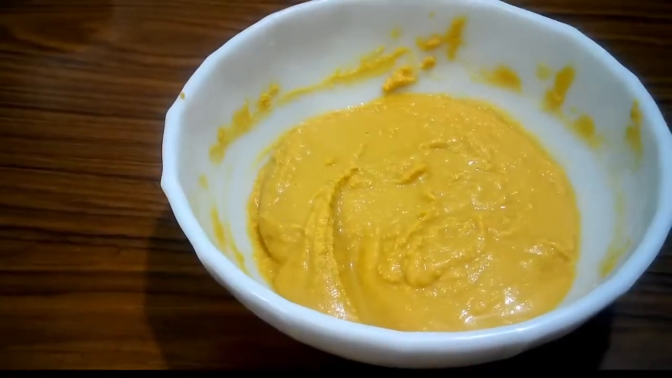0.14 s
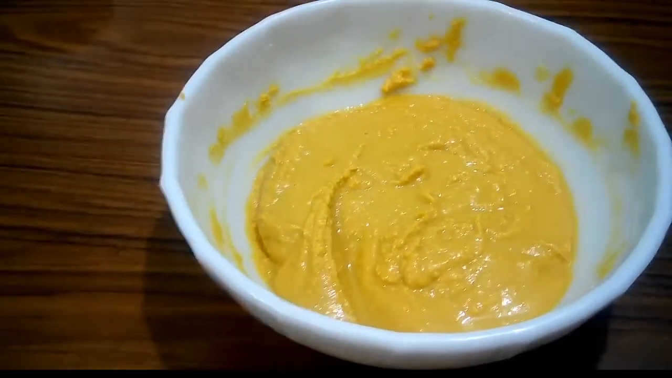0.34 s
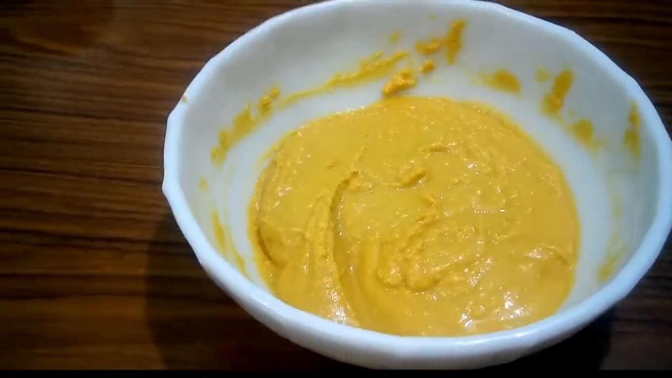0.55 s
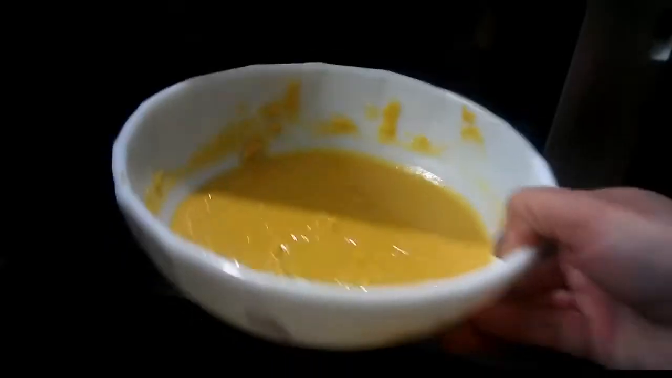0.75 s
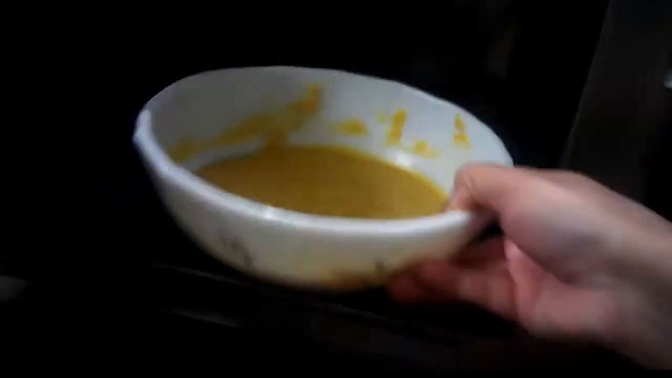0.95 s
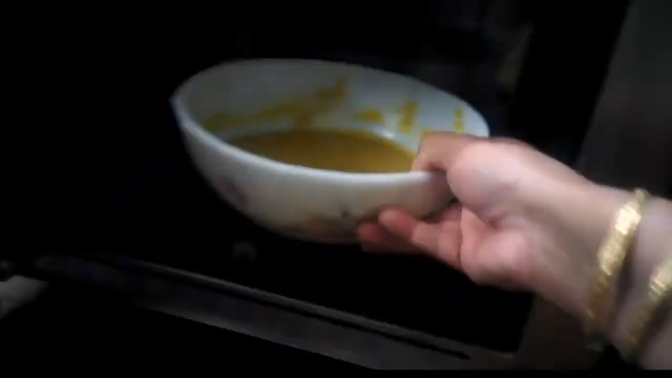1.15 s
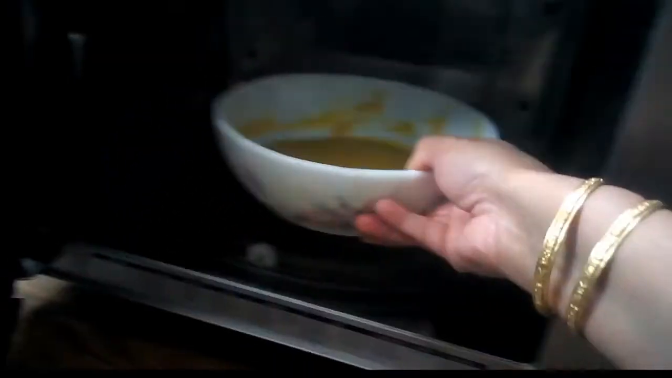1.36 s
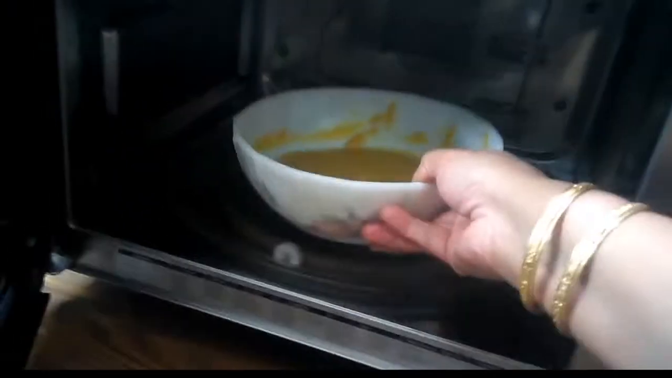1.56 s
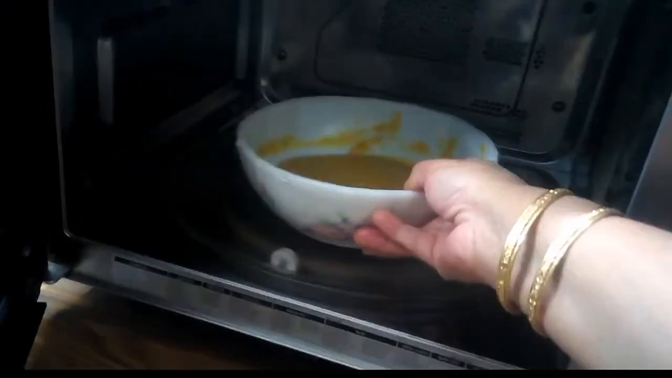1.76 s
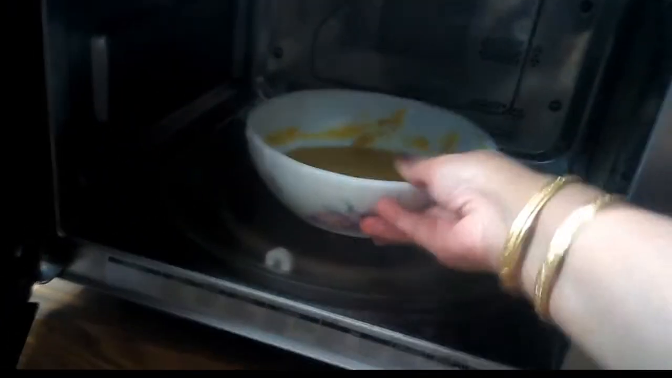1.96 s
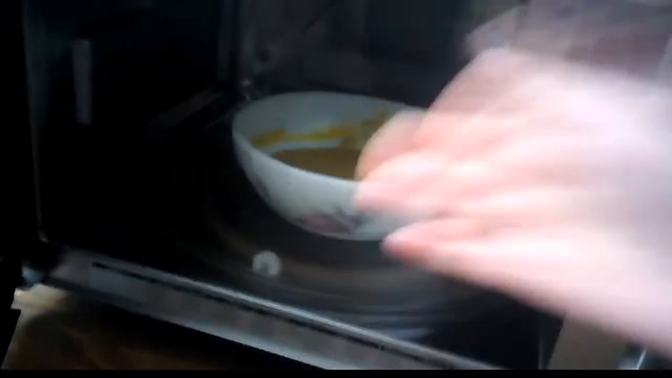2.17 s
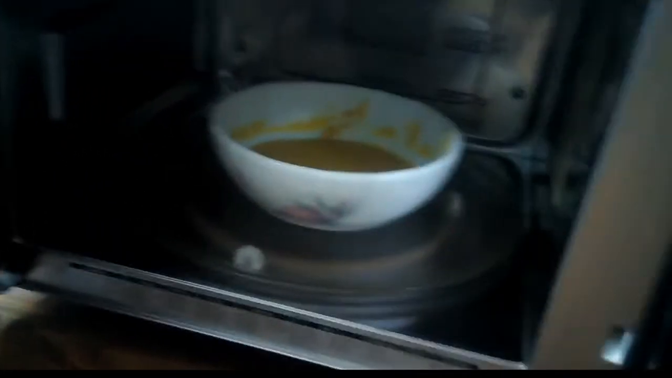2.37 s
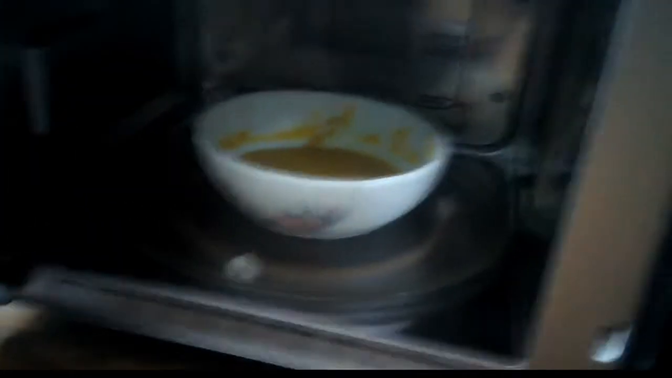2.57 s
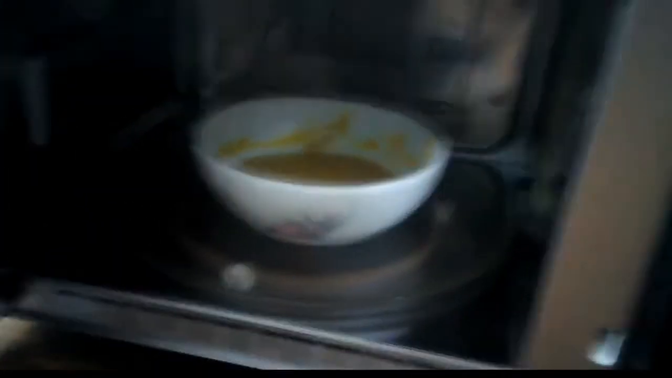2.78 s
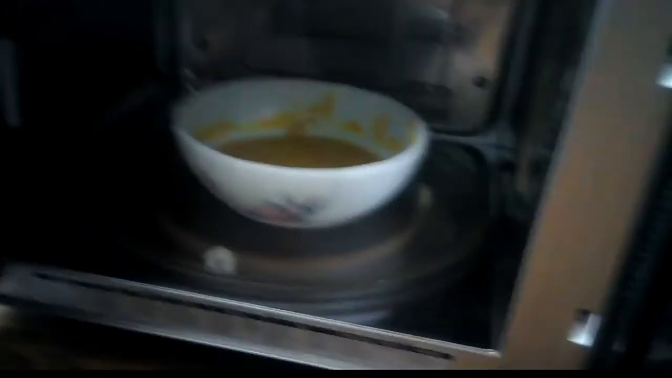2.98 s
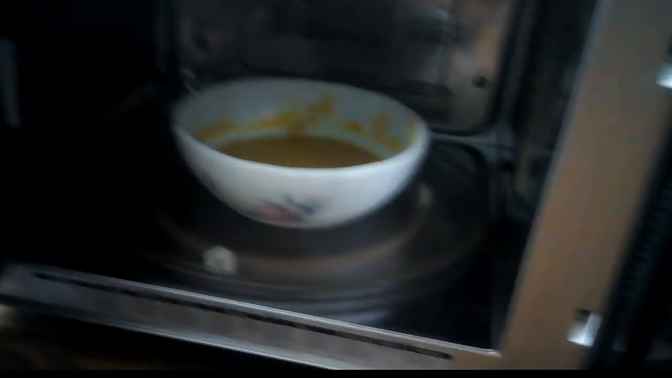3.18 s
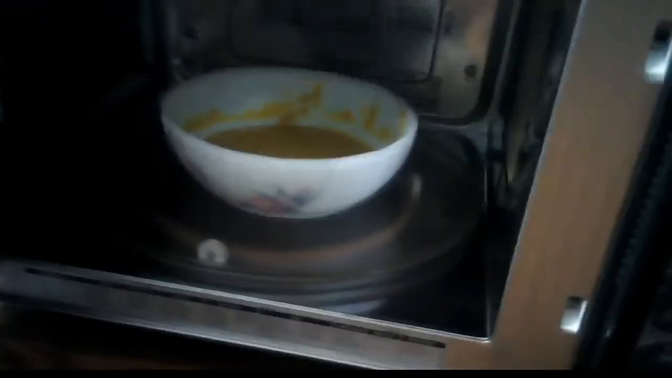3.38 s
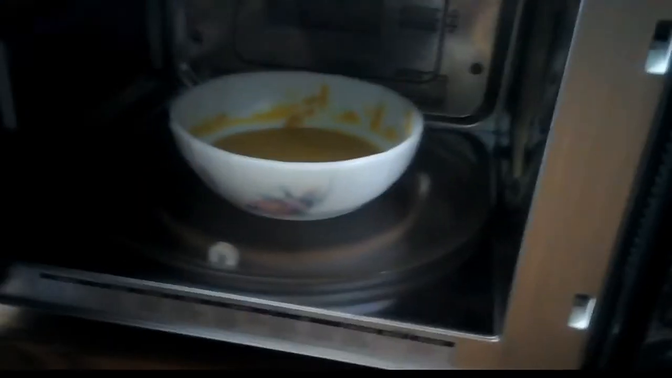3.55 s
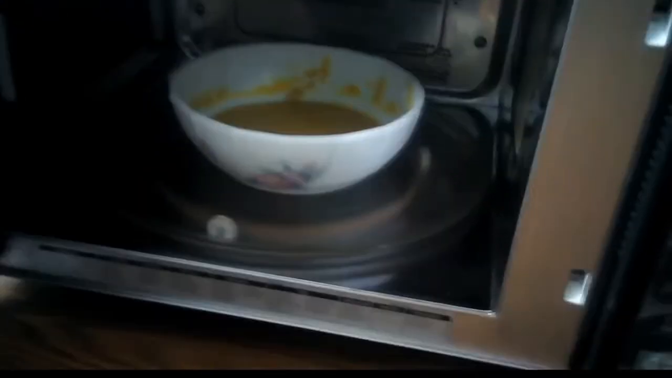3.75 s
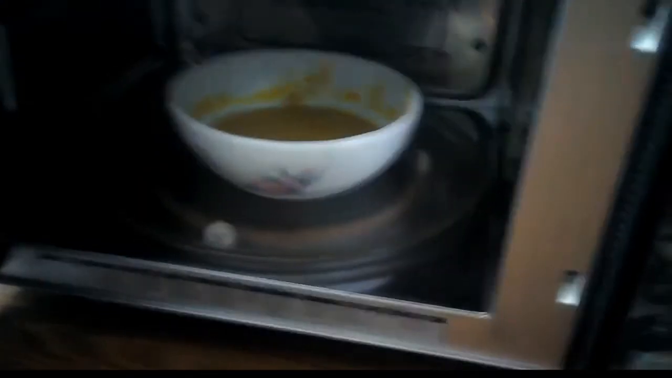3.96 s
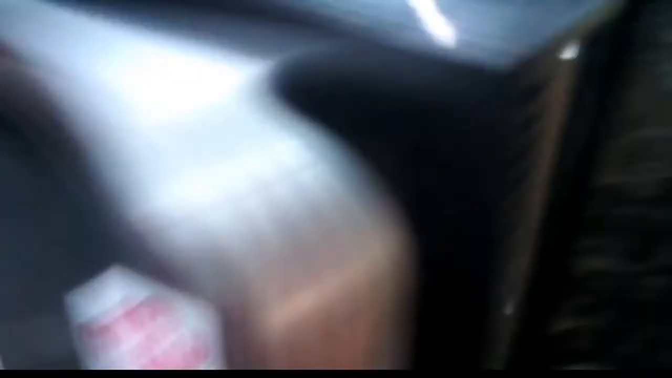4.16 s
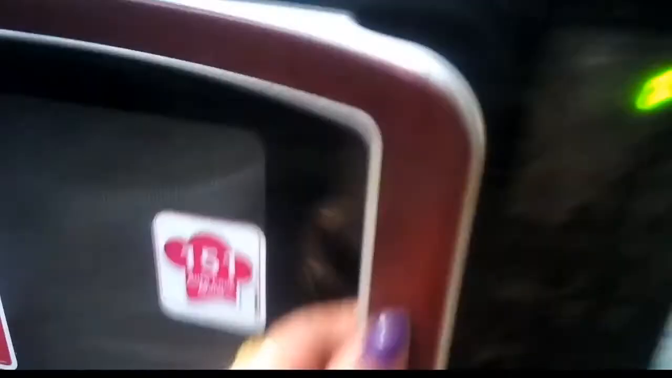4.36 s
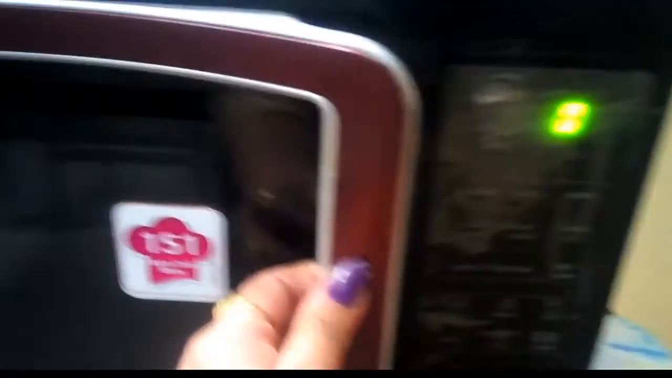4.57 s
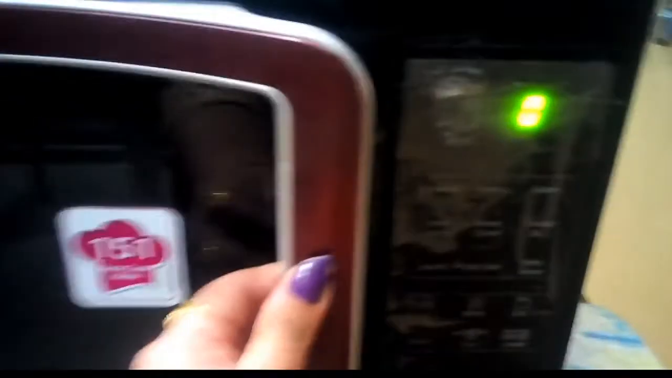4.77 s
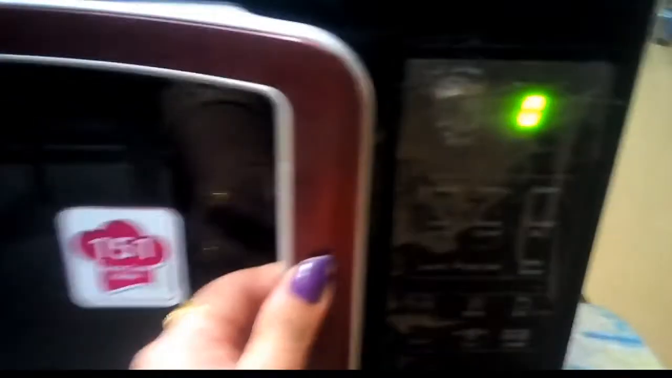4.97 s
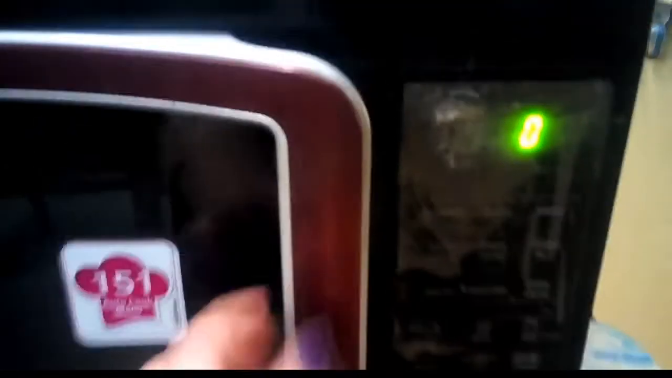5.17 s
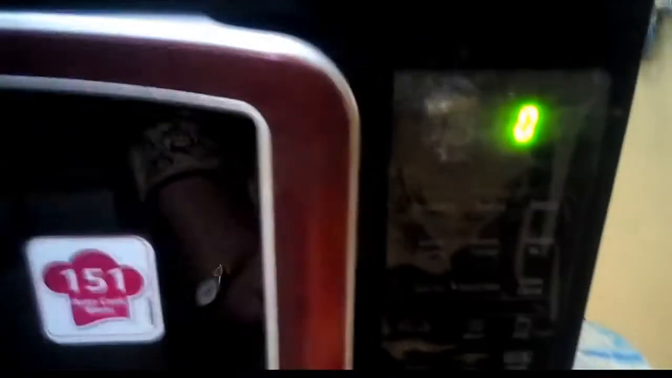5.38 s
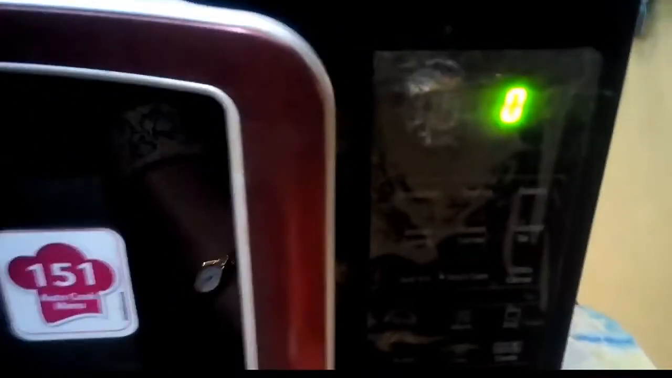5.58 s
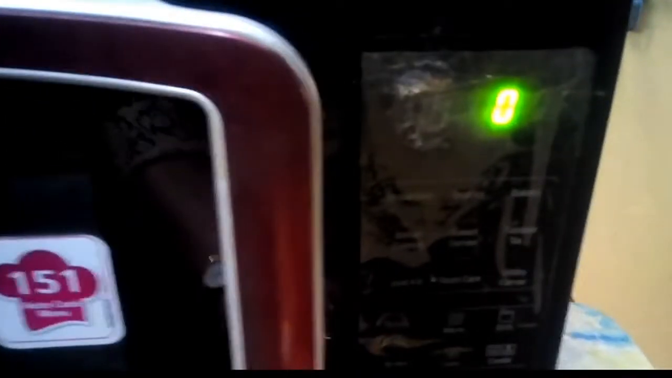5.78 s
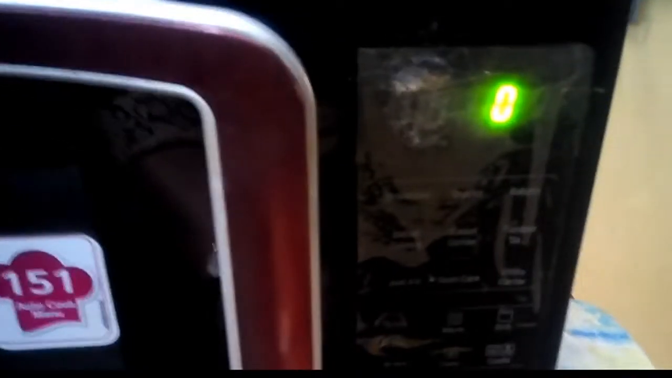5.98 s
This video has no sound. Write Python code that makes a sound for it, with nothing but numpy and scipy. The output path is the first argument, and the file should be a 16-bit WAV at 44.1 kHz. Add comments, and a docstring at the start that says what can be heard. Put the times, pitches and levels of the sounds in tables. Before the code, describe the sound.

A quiet kitchen is heard through a close handheld phone, with low hiss and a very thin high whine that fades after the first second. At about 0.5 s a finger taps the phone case dryly; sound drops out from roughly 0.6 to 0.75 s. A barely audible bangle clink comes near 1 s. At 1.95 s a glass bowl hits the microwave turntable with a loud, bright clink, ringing in the hollow metal cavity; at 2.2 s it rocks flat with a duller clunk and quick rebounds, then scrapes briefly around 2.4 s. Soft sleeve rustles brush past at 2.9-3.4 s, with case taps at 3.4 and, more firmly, 3.8 s. Dull door knocks at 4.1 s lead to a faint rub. The door clacks at 4.85 s and slams at 5.0 s with a huge sharp snap and boom, followed by fading rattle and small settling knocks until about 5.8 s.

```python
"""A glass bowl clinks down on a microwave's turntable, rocks flat and is nudged; then the door snaps shut.
Bowl, turntable and cabinet are ringing sines; the oven cavity, door panels and kitchen are fading noise.
Filtered noise makes the sliding glass, the rubbing door, the rustling sleeve and the quiet kitchen.
Finger taps, a clink of bangles and a thin whine join in. The sound drops out briefly near the start.
A phone held close picks it all up and overloads on the loudest blows."""
import sys
import numpy as np
from scipy import signal
from scipy.fft import rfft, irfft
from scipy.io import wavfile

SR = 44100
rng = np.random.default_rng(int(sys.argv[2]) if len(sys.argv) > 2 else 0)


def generate_wav(signal):
    """Clip the signal to [-1, 1] and save it as 16-bit WAV at the path in sys.argv[1]."""
    frames = np.transpose(np.atleast_2d(signal))
    scaled = np.clip(frames, -1, 1) * 32767
    pcm = np.round(scaled).astype(np.int16)
    wavfile.write(sys.argv[1], SR, pcm)


N = 265923  # length in samples

# The bowl meets the turntable. Each row: start in seconds, wall ring in dB, foot ring in dB, turntable
# clack in dB, thud of its support in dB, contact cut-off in Hz, number of rebounds.
BOWL_BLOWS = [(1.9511, -12, -14, 3, -21.5, 4000, 0), (1.956, -1.5, 0.5, 0.5, -26, 13000, 0),
              (1.9953, -17.5, -16, -4.5, -37.5, 2800, 2), (2.173, -25.5, -12, -10.5, -10.5, 2940, 0),
              (2.195, -42, -6, -11, -27, 2900, 0), (2.2029, -29.5, -9, -8, -2, 1391, 2)]
# Notes of the bowl's wall as it lies flat. Each row: pitch in Hz, level in dB, time to fall 60 dB in seconds.
WALL_MODES = [(1049, -29, 0.31), (1086, -31, .3), (1193, -17, 0.42), (1242, -27, 0.33), (1360, -31, 0.22),
              (1440, -26, 0.094), (1510, -31.5, .28), (2028, -23, 0.4), (2130, -25, 0.37),
              (2416, -33.5, .26), (3029, -9, 0.15), (2920, -38, 0.4), (3023, -14.5, 0.34), (3220, -28, 0.3),
              (4790, -34, .3), (4910, -31, 0.26), (5510, -35.5, .23), (6616, -60, .3), (6703, -53.5, .15),
              (7840, -55.5, .12)]
# Notes that a blow on the bowl's foot brings out. Each row: pitch in Hz, level in dB, 60 dB fall in seconds.
FOOT_MODES = [(3629, -38.5, .1), (4110, -37, .18), (4222, -30, 0.2), (8660, -54, .22), (9240, -55, .2),
              (9700, -52, 0.39), (9600, -54, 0.24), (10450, -58.5, 0.1807)]
# Notes of the loaded glass turntable. Each row: pitch in Hz, level in dB, 60 dB fall in seconds.
TURNTABLE_MODES = [(611, -19, 0.1), (883, -30.5, 0.15), (1004, -22, 0.11), (1130, -9.5, 0.033),
                   (1330, -17.5, 0.037), (1469, -15, 0.033), (2068, -13, 0.05), (2351, -23.5, 0.054),
                   (3530, -25, 0.15)]
# Notes of the roller support and oven floor. Each row: pitch in Hz, level in dB, 60 dB fall in seconds.
SUPPORT_MODES = [(300, -18, 0.1112), (318, -32, 0.94), (330, -29, .85), (397, -35.5, 0.58),
                 (446, -44.5, 0.78), (583.7, -21, 0.2), (597, -40.5, .85), (651, -36, 0.23), (73, -41, .4)]
# The dense ring of the oven cavity. Each row: frequency in Hz, level in dB, 60 dB fall in seconds.
CAVITY_BANDS = [(49.76, -35.5, 0.61), (149, -29, 0.93), (307, -13, 1), (650, -13, 0.9), (710, -21.5, 0.98),
                (1240, -16, 0.93), (1823, -21.5, 0.85), (3340, -18.5, 0.57), (4400, -36, 0.7),
                (6000, -59.5, .2), (10000, -63.5, .15), (16070, -61, 0.083)]
# The hand or the turntable presses on the glass and damps it. Each row: middle in seconds, loss in dB.
GLASS_PRESSES = [(2.03, 6.5), (2.19, 18), (2.455, 16.5)]
# The bowl is nudged along. Each row: peak in seconds, pressure in dB, rise in seconds, fall in seconds.
BOWL_NUDGES = [(2.369, -30, .026, 0.026), (2.426, -34.5, 0.0099, 0.0066)]

# Blows of the door. Each row: start in seconds, panel rattle in dB, latch crack in dB, cabinet boom in dB,
# contact cut-off in Hz.
DOOR_BLOWS = [(4.114, -45, -53, -61, 5000), (4.131, -39, -47.5, -62, 4600),
              (4.1387, -34.5, -36.5, -58, 4850), (4.849, -19.5, -32, -33, 6500),
              (4.854, -17.5, -27.5, -30.5, 5800), (4.873, -38.5, -28.5, -21, 9500),
              (4.996, -11.5, -49.5, -32.5, 11000), (5.006, -11.5, -24.5, -37.5, 12100),
              (5.0143, 0.5, -4.5, -0.5, 16000)]
# Loose panels settle after the slam. Each row: start in seconds, rattle in dB.
PANEL_SETTLING = [(5.336, -23.5), (5.385, -32.5), (5.4888, -33), (5.5858, -31.5), (5.769, -37.5)]
# Notes of the cabinet's panels; the first two are the heave of the whole door.
# Each row: pitch in Hz, level in dB, 60 dB fall in seconds.
CABINET_MODES = [(196, -4, 0.058), (415, -5, 0.048), (89, -29.5, .6), (120, -35, 1.3), (170, -32.5, 0.56),
                 (201, -30.5, 0.42), (215.5, -24, 0.45), (257, -29.5, 0.7), (357, -22.5, 0.65),
                 (405, -21.5, 0.17), (451.7, -26, 0.73), (492, -36.5, 1.3), (556, -20.5, 0.42),
                 (655, -28, .5), (736, -37.5, .55), (1013, -20.5, 0.17), (1137, -34, 0.43),
                 (1755, -24, 0.19), (1840, -35, 0.36), (2600, -36, 0.51)]
# Door panels and kitchen together. Each row: frequency in Hz, level in dB, 60 dB fall in seconds.
PANEL_BANDS = [(65, -27.5, .7), (90, -12.5, 1), (200, 0, 0.87), (450, -5, 0.68), (750, -11.5, 0.89),
               (1100, -8.5, 0.63), (1900, -12.5, 0.67), (3080, -10.5, 0.54), (4390, -20, 0.47),
               (5570, -30, 0.39), (7400, -39.5, .26), (9900, -32, 0.38), (11480, -42, 0.13),
               (16000, -39, .12)]
# The latch hooks snapping home. Each row: frequency in Hz, level in dB, 60 dB fall in seconds.
LATCH_BANDS = [(60.2, -17.5, .04), (300, -3.5, 0.024), (1200, 0.5, .03), (2989, 10.5, 0.03),
               (5732, -2.5, 0.014), (7600, -21.5, 0.016), (9400, -8, 0.038), (15600, -27.5, .02)]
# The open door is pulled off its stop. Each row: start in seconds, level in dB.
DOOR_STOP_KNOCKS = [(4.114, -1), (4.1407, -2), (4.151, 6), (4.177, -7.5)]
# Notes of the free-hanging door. Each row: pitch in Hz, level in dB, 60 dB fall in seconds.
HINGE_MODES = [(118, -55.5, 0.3), (175, -58, .6), (243.5, -35, 0.29), (245, -47.5, 0.76), (374, -38, 0.08),
               (448, -36.5, 0.1), (425, -55, 0.72), (615, -55.5, 0.32), (712, -45, 0.079)]
# Rubs of the moving door: the hinge as it swings, then the latch hooks sliding on their ramp.
# Each row: peak in seconds, level in dB, rise in seconds, fall in seconds.
DOOR_RUBS = [(4.47, -52, 0.19, .15), (4.815, -57, 0.047, .04)]
# Colour of the rubbing door. Each row: frequency in Hz, level in dB.
DOOR_RUB_COLOUR = [(60, -9.5), (150, 12), (260, 9), (500, -2.5), (1100, 7), (1800, -10), (2700, -6),
                   (5000, -19), (16000, -42.5)]

# Fingers tap on the phone's case. Each row: start in seconds, level in dB, contact cut-off in Hz,
# hollow pitch of that spot in Hz.
CASE_TAPS = [(0.4905, 0.5, 4100, 715), (0.505, -19, 4500, 3600), (0.614, -20, 5170, 4030),
             (3.37, -14.5, 3800, 1295), (3.593, -26.5, 4000, 3000), (3.771, -21, 5000, 1290),
             (3.7821, -2, 1700, 1050), (3.7842, 0, 4000, 1590), (3.789, -4, 14000, 496)]
# The phone's case. Each row: frequency in Hz, level in dB, 60 dB fall in seconds.
CASE_BANDS = [(100, -35, 0.01), (310, -51, 0.027), (684, -22.5, 0.011), (1390, -25.5, 0.019),
              (2350, -18, 0.0048), (4100, -25.5, 0.024), (6100, -34, 0.023), (16000, -46, .01)]
# Strokes of sleeve and hand. Each row: peak in seconds, level in dB, crispness in dB relative to that,
# rise in seconds, fall in seconds.
CLOTH_STROKES = [(.29, -58, -20, 0.094, 0.082), (.505, -54, -18, 0.01, 0.051),
                 (2.942, -54.5, -14, 0.017, .04), (2.993, -43.5, -12.5, .008, 0.04),
                 (3.105, -48, -20, .008, .012), (3.134, -40, -4.5, 0.024, 0.013),
                 (3.314, -50, -18.5, 0.029, .014), (3.418, -43, -7.5, .02, 0.012)]
# Colour of the rubbing folds. Each row: frequency in Hz, level in dB.
FOLD_COLOUR = [(200, -22), (900, -4.5), (1800, 2), (2800, 5), (3800, -1.5), (5500, -13.5), (16000, -18)]
# Colour of the crisp fibres. Each row: frequency in Hz, level in dB.
FIBRE_COLOUR = [(3000, -23.5), (7500, -6), (10000, 0.5), (13000, 4), (16000, -6)]
# Bangles touching. Each row: pitch in Hz, level in dB, 60 dB fall in seconds.
BANGLE_MODES = [(4430, -67, 0.098), (4660, -67, 0.055), (4880, -70, .1)]
# Colour of the kitchen at rest. Each row: frequency in Hz, relative level in dB per Hz.
QUIET_COLOUR = [(25, -11), (70, -11), (110, -5.5), (170, -4.5), (270, -6), (400, -10.5), (760, -7),
                (1300, -15.5), (3000, -20.5), (6000, -22.5), (6600, -17.5), (8800, -17.5), (9400, -20),
                (15500, -26.5)]

# A softer contact rebounds later: the first gap is counted in periods of the contact cut-off.
# Each later gap shrinks, and the bowl loses strength while it is in the air.
REBOUND_PERIODS, REBOUND_SHRINK, REBOUND_LOSS_DB_PER_S = 44, .9, 329.5
# Until it lies flat, the bowl stands on its edge and its wall rings longer by this factor.
FLAT_S, EDGE_SUSTAIN = 2.17, 1.35
PRESS_S = .035  # each press takes hold over this many seconds
# An almost round bowl has each note twice: the weaker twin lies a little higher and beats with it.
TWIN_SPLIT, TWIN_DB = .007, -8
# The rattle builds up over this many periods of the contact cut-off: slower after a softer blow.
BUILD_PERIODS = 22
# Settling panels make soft contacts; crack and boom are relative to the rattle.
SETTLE_HZ, SETTLE_CRACK_DB, SETTLE_BOOM_DB = 2700, -14.5, -13
# After each stroke the cloth settles faintly; the fibres hiss a moment after the folds rub.
CLOTH_SETTLE_DB, CLOTH_SETTLE_S, FIBRE_LAG_S, FIBRE_RISE_SHARE = -15, 0.11, 0.0048, 0.65
QUIET_DB = -66.5  # overall level of the quiet kitchen
# A faint high whine holds steady until WHINE_HOLD_S, then dies away as the phone turns to the oven.
WHINE_DB, WHINE_HOLD_S, WHINE_FADE_S = -80, .7, .6
# The sound fades out, drops out briefly and comes back.
GAP_START_S, GAP_END_S, GAP_FADE_S, GAP_RETURN_S = 0.594, .757, 0.027, 0.0082
TOP_HZ = 15600  # the phone passes nothing much higher
RING_S = 1.5  # length of every ring
AGE = np.arange(int(RING_S * SR)) / SR  # seconds since a blow
TIME = np.arange(N) / SR  # seconds since the start
# The uneven heights of crowded resonances, the same for every blow.
RIPPLE = rng.standard_normal(2000)


def bowl(cavity_db=-6, crack_db=-21):
    """The bowl lands, chatters and rocks flat on the turntable, then scrapes a little way."""
    singing, knocks = np.zeros(N), np.zeros(N)
    wall, foot = ring(twinned(WALL_MODES), contact_s=.0015), ring(twinned(FOOT_MODES), contact_s=.002)
    edge_modes = [(hz, db, t60 * EDGE_SUSTAIN) for hz, db, t60 in twinned(WALL_MODES)]
    edge_wall = ring(edge_modes, contact_s=0.0014)
    plate, support = ring(TURNTABLE_MODES, contact_s=0.00091), ring(SUPPORT_MODES, contact_s=0.00067)
    damping = press_damping()
    for s, wall_gain, foot_gain, clack_gain, thud_gain, hz in contacts():
        glass = wall_gain * (edge_wall if s < FLAT_S else wall) + foot_gain * foot
        # each ring suffers only the damping that comes after its own blow
        add(singing, s, glass / damping[int(s * SR)])
        cavity = amp(cavity_db) * dense_ring(CAVITY_BANDS, uneven_db=2.5)
        crack = amp(crack_db) * dense_ring(LATCH_BANDS)
        clack = plate + cavity + crack
        add(knocks, s, soften(clack_gain * clack + thud_gain * support, hz))
    scrape, scrape_ring = sliding(wall, foot, damping)
    return (singing + scrape_ring) * damping + knocks + scrape


def contacts():
    """Each blow and its ever quicker, weaker rebounds: seconds, wall, foot, clack, thud gains, cut-off Hz."""
    for s, *levels_db, hz, rebounds in BOWL_BLOWS:
        late_s = 0
        for k in range(1 + round(rebounds)):
            gains = amp(np.array(levels_db) - REBOUND_LOSS_DB_PER_S * late_s)
            yield s + late_s, *gains, hz
            late_s += REBOUND_PERIODS / hz * REBOUND_SHRINK ** k


def press_damping():
    """Touching the glass takes away vibration: the gain steps down smoothly at each press."""
    loss_db = sum(db * np.clip((TIME - s) / PRESS_S + .5, 0, 1) for s, db in GLASS_PRESSES)
    return amp(-loss_db)


def twinned(modes):
    """Glass notes together with their slightly higher twins."""
    return modes + [(hz * (1 + TWIN_SPLIT), db + TWIN_DB, t60) for hz, db, t60 in modes]


def sliding(wall, foot, damping, scrape_db=15.0, ring_db=-13, wall_db=-12):
    """Sliding is a rough scrape and a stream of tiny slips that keep the glass singing."""
    pressure = sum(swell(*nudge) for nudge in BOWL_NUDGES)
    # differencing twice makes the slips sharp
    slips = np.diff(pressure * rng.standard_normal(N), 2, prepend=[0, 0])
    scrape = amp(scrape_db) * pressure * hiss([row[:2] for row in CAVITY_BANDS], uneven_db=2)
    glass = foot + amp(wall_db) * wall
    return scrape, amp(ring_db) * signal.fftconvolve(slips / damping, glass)[:N]


def door():
    """Each blow cracks at the latch, heaves the cabinet and spreads into the panels and the room."""
    out, boom = np.zeros(N), ring(CABINET_MODES)
    settling = [(s, db, db + SETTLE_CRACK_DB, db + SETTLE_BOOM_DB, SETTLE_HZ) for s, db in PANEL_SETTLING]
    for s, rattle_db, crack_db, boom_db, hz in DOOR_BLOWS + settling:
        build_up = 1 - np.exp(-AGE * hz / BUILD_PERIODS)
        rattle = dense_ring(PANEL_BANDS) * build_up
        crack = dense_ring(LATCH_BANDS)
        blow = amp(rattle_db) * rattle + amp(crack_db) * crack + amp(boom_db) * boom
        add(out, s, soften(blow, hz))
    return out


def moving_door(room_db=-32.0, dull_hz=600):
    """Dull knocks ring the hanging door as it starts to move; then hinge and latch hooks rub softly."""
    out, body = np.zeros(N), ring(HINGE_MODES, contact_s=0.0017)
    for s, db in DOOR_STOP_KNOCKS:
        room = amp(room_db) * soften(dense_ring(PANEL_BANDS), dull_hz)
        add(out, s, amp(db) * (body + room))
    moving = TIME > DOOR_STOP_KNOCKS[0][0]
    pressure = sum(swell(*rub) for rub in DOOR_RUBS)
    return out + moving * pressure * hiss(DOOR_RUB_COLOUR)


def taps(room_db=-42, hollow_db=-37, hollow_t60=0.026):
    """A finger sets off the phone's dry case, a short hollow note and a trace of room."""
    out = np.zeros(N)
    for s, db, hz, pitch_hz in CASE_TAPS:
        hollow = ring([(pitch_hz, hollow_db, hollow_t60)])
        tap = dense_ring(CASE_BANDS) + hollow + amp(room_db) * dense_ring(CAVITY_BANDS)
        add(out, s, amp(db) * soften(tap, hz))
    return out


def cloth(grain_db=2.5, grain_hz=220):
    """Rubbing cloth catches and slips in fine grains: noise whose level wavers at random."""
    rub, crisp = np.zeros((2, N))
    for s, db, crisp_db, rise_s, fall_s in CLOTH_STROKES:
        rub = np.hypot(rub, stroke(s, db, rise_s, fall_s))
        fibre_stroke = stroke(s + FIBRE_LAG_S, db + crisp_db, rise_s * FIBRE_RISE_SHARE, fall_s)
        crisp = np.hypot(crisp, fibre_stroke)
    # folds and single fibres catch at different moments
    folds, fibres = (np.interp(TIME * grain_hz, np.arange(N), rng.standard_normal(N)) for _ in range(2))
    fold_sound = rub * amp(grain_db * folds) * hiss(FOLD_COLOUR, uneven_db=3)
    fibre_sound = crisp * amp(grain_db / 2 * fibres) * hiss(FIBRE_COLOUR)
    return fold_sound + fibre_sound


def stroke(peak_s, db, rise_s, fall_s):
    """One brush of cloth and its faint, slower settling."""
    settling = swell(peak_s, db + CLOTH_SETTLE_DB, rise_s, CLOTH_SETTLE_S)
    return np.maximum(swell(peak_s, db, rise_s, fall_s), settling)


def bangles(s=0.98):
    """One faint clink at the wrist: a few high notes of ringing bangles."""
    out = np.zeros(N)
    add(out, s, ring(BANGLE_MODES))
    return out


def whine(hz=4056):
    """A thin steady tone that holds at first, then fades exponentially."""
    fade = np.exp(-np.maximum(TIME - WHINE_HOLD_S, 0) / WHINE_FADE_S)
    return amp(WHINE_DB) * fade * np.sin(2 * np.pi * hz * TIME)


def quiet_kitchen():
    """The kitchen at rest: a steady hiss of coloured noise."""
    air = hiss(QUIET_COLOUR)
    return air / np.std(air) * amp(QUIET_DB)


def gap():
    """A gain that falls to near silence for a moment and returns."""
    leaving = np.exp(-np.maximum(TIME - GAP_START_S, 0) / GAP_FADE_S)
    returning = np.exp(-np.maximum(GAP_END_S - TIME, 0) / GAP_RETURN_S)
    return np.maximum(leaving, returning)


def ring(modes, contact_s=0.00054):
    """A struck body: decaying sines of alternating sign that swell while the contact lasts."""
    sines = np.zeros(len(AGE))
    for k, (hz, db, t60) in enumerate(modes):
        sines += (-1) ** k * amp(db - 60 * AGE / t60) * np.sin(2 * np.pi * hz * AGE)
    return sines * (1 - np.exp(-(AGE / contact_s) ** 2))


def dense_ring(bands, uneven_db=3.0, spacing_hz=22):
    """Countless overlapping notes: noise whose bands each die at their own rate."""
    hz, db, t60 = np.transpose(bands)
    noise = hiss(np.c_[hz, db], size=len(AGE), uneven_db=uneven_db, spacing_hz=spacing_hz)
    spectrum = rfft(noise)
    log_f = np.log(np.maximum(np.fft.rfftfreq(len(AGE), 1 / SR), 1))
    out = np.zeros(len(AGE))
    # neighbouring bands overlap, and their shares add up to one
    for row, fall_s in zip(np.eye(len(hz)), t60):
        share = np.interp(log_f, np.log(hz), row)
        out += irfft(spectrum * share, len(AGE)) * np.exp(-np.log(1000) * AGE / fall_s)
    return out


def hiss(points, size=N, uneven_db=3.5, spacing_hz=70):
    """Noise coloured by (Hz, dB) points and broken into crowded resonances."""
    hz, db = np.transpose(points)
    f = np.maximum(np.fft.rfftfreq(size, 1 / SR), 1)
    heights = np.interp(f / spacing_hz, np.arange(len(RIPPLE)), RIPPLE)
    ripple = amp(uneven_db * np.minimum(f / 1000, 1) * heights)  # smoother below 1000 Hz
    colour = amp(np.interp(np.log(f), np.log(hz), db))
    gain = colour * ripple / np.sqrt(np.mean(ripple ** 2))
    return irfft(rfft(rng.standard_normal(size)) * gain, size)


def swell(peak_s, db, rise_s, fall_s):
    """The pressure of one rubbing stroke: it grows exponentially to a peak and dies away."""
    return amp(db) * np.exp(-np.maximum((peak_s - TIME) / rise_s, (TIME - peak_s) / fall_s))


def soften(x, hz):
    """A softer contact passes less treble: a low-pass filter."""
    return signal.sosfilt(signal.butter(3, min(hz, SR / 2 - 1000), fs=SR, output="sos"), x)


def add(track, s, sound):
    """Mix a sound into a track at a time in seconds."""
    start = int(s * SR)
    track[start:start + len(sound)] += sound[:N - start]


def amp(db):
    """Turn decibels into gain."""
    return 10 ** (np.asarray(db) / 20)


def scene():
    """All sources at one microphone, with the brief dropout."""
    oven = bowl() + door() + moving_door()
    handling = taps() + cloth() + bangles()
    background = whine() + quiet_kitchen()
    return ((oven + handling + background) * gap())[None]


def record(dry, low_cut_hz=72):
    """The phone sheds the deep bass, rounds off peaks near full scale and cuts the top."""
    thin = signal.sosfilt(signal.butter(6, low_cut_hz, "high", fs=SR, output="sos"), dry)
    rounded = thin / (1 + thin ** 6) ** (1 / 6)
    return signal.sosfilt(signal.ellip(10, .2, 80, TOP_HZ, fs=SR, output="sos"), rounded)


dry = scene()
out = record(dry)
generate_wav(out)
```